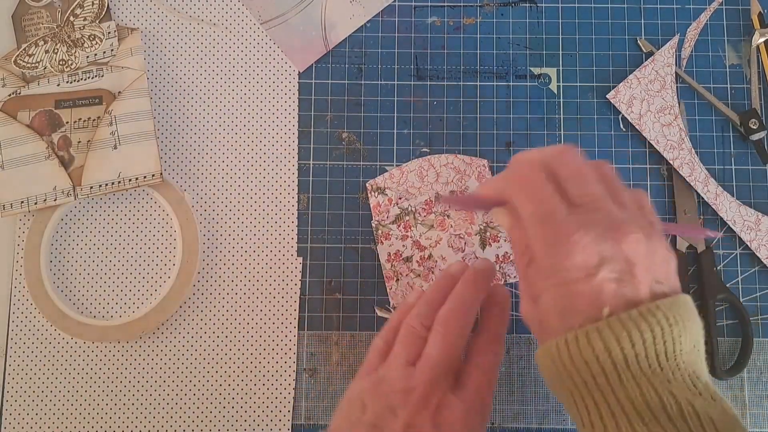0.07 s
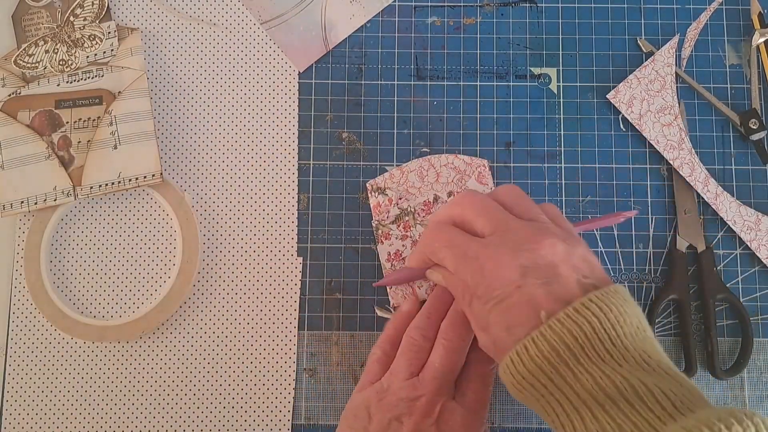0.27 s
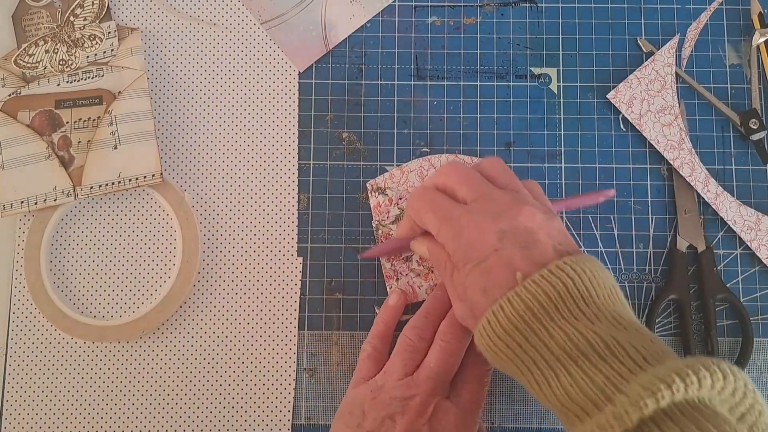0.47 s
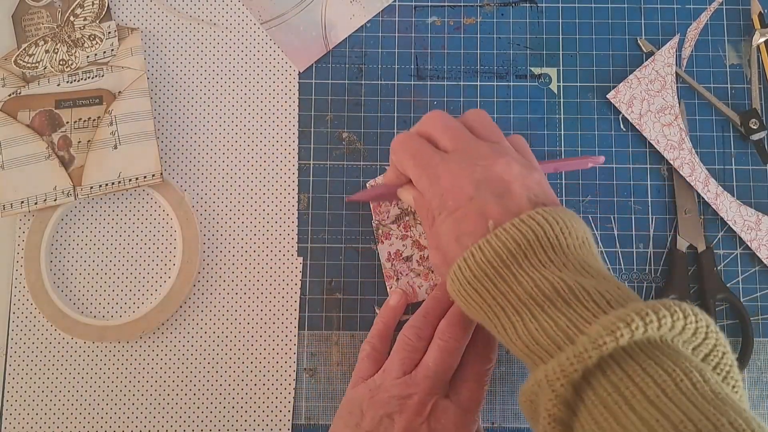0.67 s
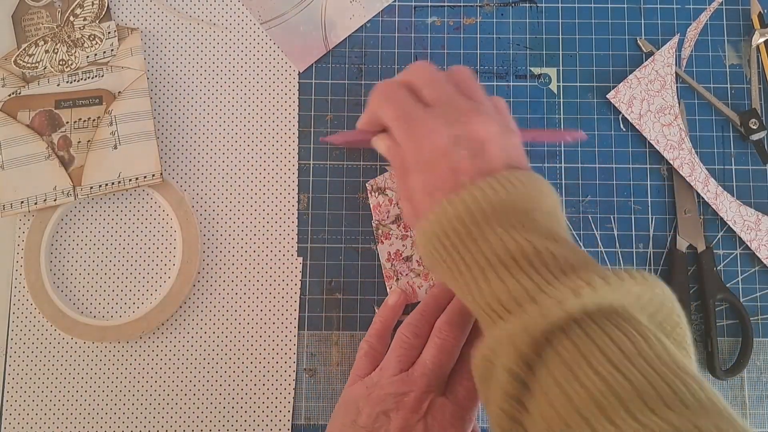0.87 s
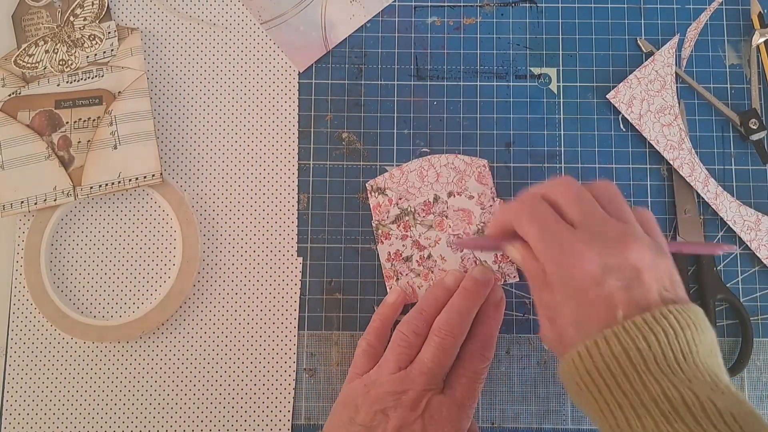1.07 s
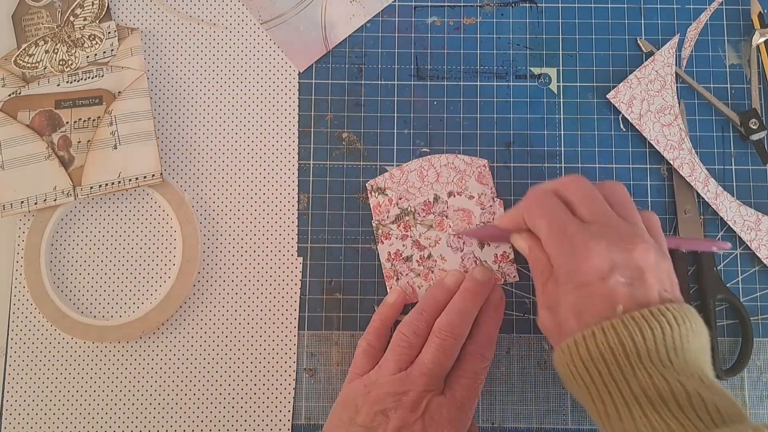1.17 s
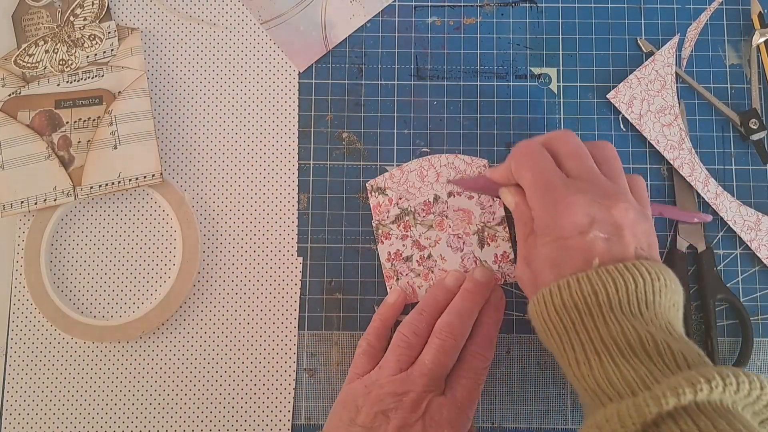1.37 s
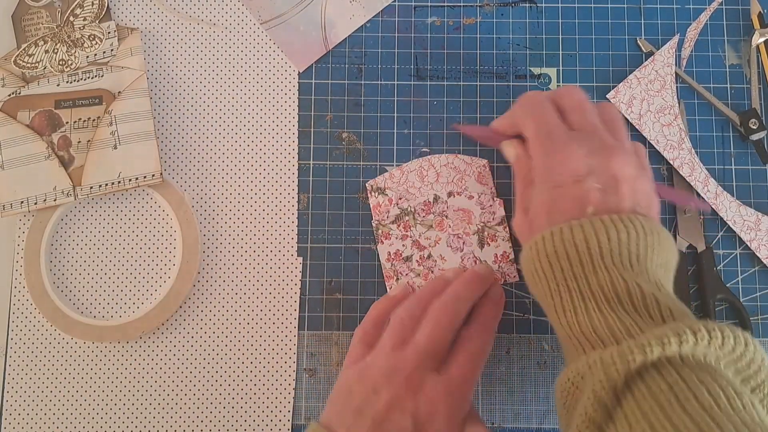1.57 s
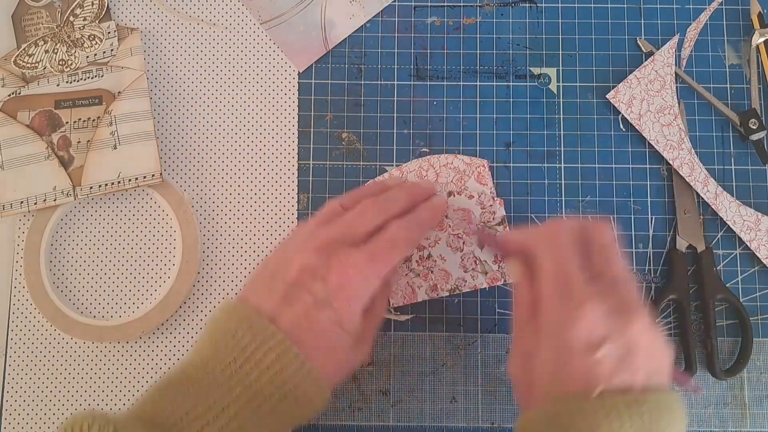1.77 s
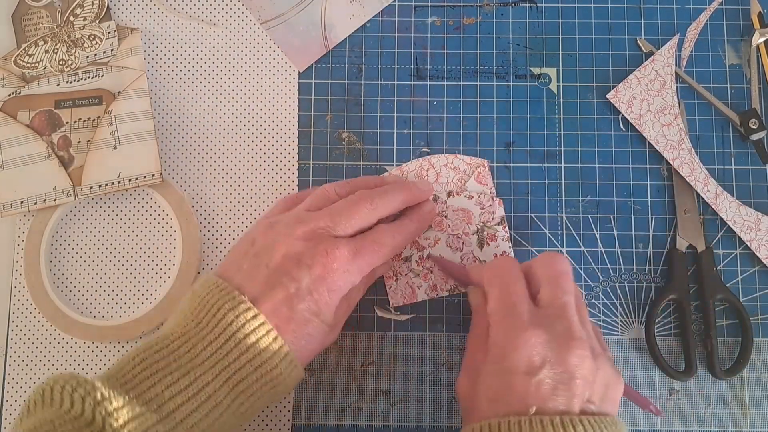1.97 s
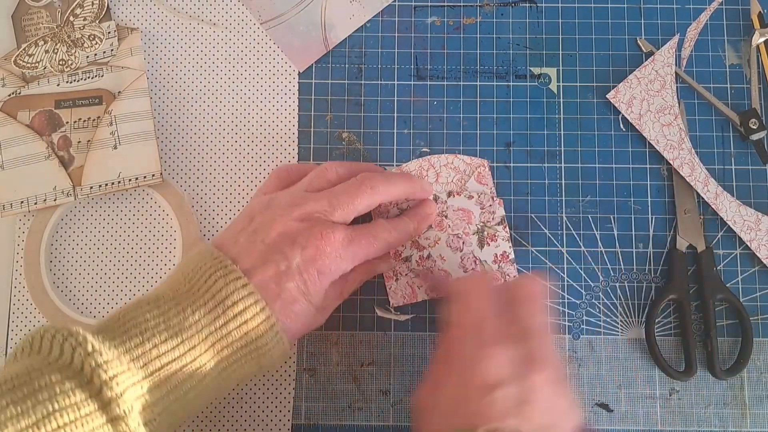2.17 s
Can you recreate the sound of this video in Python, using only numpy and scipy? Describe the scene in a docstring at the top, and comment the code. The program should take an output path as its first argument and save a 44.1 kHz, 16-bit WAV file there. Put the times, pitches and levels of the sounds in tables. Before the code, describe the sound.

A folding tool rubs and taps along paper on a cutting mat, with soft thumps.

```python
"""A small room, close to a cutting mat where a bone folder creases folded paper.
Its tip rubs along the fold, tiny slips over the fibres making the paper hiss, and taps down on the mat.
The paper ticks and swishes as the fingers shift it; the pressing hands thump the table beneath.
Beside the hiss is a faint, breath-like airy noise with steady resonances near 400 and 1900 Hz.
One soft, very low bump comes early, like a puff of air on the microphone; a quiet rumble lies under all."""
import sys
import numpy as np
from scipy import signal
from scipy.fft import rfft, irfft, next_fast_len
from scipy.io import wavfile
from scipy.ndimage import map_coordinates

SR = 44100
rng = np.random.default_rng(int(sys.argv[2]) if len(sys.argv) > 2 else 0)


def wrap_up_sound(samples):
    """Save the sound to the file named by the first command line argument, as 16-bit audio."""
    columns = np.atleast_2d(samples).T
    # keep every value between -1 and 1, then stretch to whole-number steps
    tamed = np.clip(columns, -1, 1)
    steps = np.round(tamed * 32767).astype(np.int16)
    wavfile.write(sys.argv[1], SR, steps)


N = 97284


# envelope of the paper's hiss: time_s, relative_db
HISS_ENVELOPE = [(0.0, -65), (0.31, -92.5), (0.5, -71), (0.71, -60.5), (0.78, -68), (0.92, -69.5),
                 (1.05, -87), (1.27, -71.5), (1.39, -73.5), (1.51, -73.5), (1.95, -79.5), (2.08, -76),
                 (2.2, -81)]
# tone of the hiss: frequency_hz, gain_db
HISS_EQ = [(200, -50), (900, -7), (2500, -4), (4000, -0.5), (5500, 0.5), (7700, 2), (9200, -2),
           (11800, -0.5), (15500, -8.5)]

def folder_rub(gain_db=1.5):
    """Tiny slips under the tip make the paper hiss."""
    return amp(gain_db) * ride(HISS_ENVELOPE) * spread(grains(), lambda hz: amp(curve(HISS_EQ, hz)))


# hits of the tip: start_s, level_db, ring_hz, ring_db, treble_db, t60_s, pan_db
TIP_HITS = [(.2785, -51, 2830, 14, -6, 0.039, 0.5), (.3835, -57, 3500, 7, 0, 0.023, -4),
            (.727, -50, 2200, 4, -8, 0.012, 5), (.876, -37.5, 2880, 9, -18, .035, -0.5),
            (.919, -50, 2800, 10, -20, 0.028, -10), (1.214, -29, 1326, 10.5, -5, 0.0088, -4),
            (1.6285, -42, 1830, 7, -12.5, 0.083, -4), (1.9928, -31.5, 3340, 5.5, -1.5, 0.016, -5)]
# tone of a hit: frequency_hz, gain_db
TIP_EQ = [(100, -9.5), (400, -9), (700, -7), (1100, -0.5), (1700, -8), (2450, -0.5), (3300, -4),
          (3950, 2.5), (5000, -4.5), (6700, -6), (9200, -10.5), (12000, -15.5), (15500, -21)]

def folder_taps():
    """The folder's tip meets the mat with a short knock."""
    return clicks(TIP_HITS, TIP_EQ, ring_octaves=0.16)


# paper snaps: start_s, level_db, ring_hz, ring_db, treble_db, t60_s, pan_db
SNAPS = [(.0925, -38, 3200, 10.5, 1, 0.015, 1), (.1635, -63, 4000, -7, 5, .006, 2),
         (.198, -54, 2780, 8, 1, 0.0053, 4), (.219, -57, 9835, 6, 5, .006, 2),
         (.296, -44, 3800, 7.5, 3.5, 0.023, 1), (.4735, -61, 7500, 12, 6, .006, -8),
         (.783, -45, 6000, -5, 8, 0.0042, 0), (1.635, -42.5, 13100, 7, -6, .01, 8),
         (1.6895, -42.5, 10600, 12, -3.5, .005, 2), (1.7033, -43, 7000, 3, 0, 0.0054, -4),
         (1.7063, -35.5, 6740, 2, 11, 0.0081, 1.5), (1.737, -47, 3360, 14, 9, .012, -3),
         (1.864, -50, 2520, 5, -4, 0.032, -0.5), (1.8935, -44, 3950, 10.5, -4.5, .008, -4.5),
         (1.973, -58, 3180, 10, 0, .05, 0)]
# tone of a snap: frequency_hz, gain_db
SNAP_EQ = [(200, -43), (1200, 0), (2500, -3), (4000, -1), (7500, 0), (9200, -8), (12000, -4), (15500, -8.5)]

def paper_ticks():
    """Paper edges snap with a thin, bright click."""
    return clicks(SNAPS, SNAP_EQ, ring_octaves=0.23)


# finger slides: peak_s, level_db, rise_s, fall_s, treble_db
SLIDES = [(0.01, -55.5, 0.047, 0.058, -11), (.305, -69.5, 0.016, 0.025, 0.5), (.4, -72, .015, 0.014, 3),
          (0.909, -59, 0.034, 0.027, -20), (1.487, -63.5, 0.011, 0.012, 5.5), (1.725, -60, 0.035, 0.013, 4),
          (1.892, -62.5, 0.014, 0.016, 3.5), (2.155, -59.5, .027, 0.022, 1.5)]
# tone of a slide: frequency_hz, gain_db
SLIDE_EQ = [(200, -7.5), (700, -3), (1500, -9.5), (2100, -2), (2700, 1.5), (3700, 0), (5200, -1.5),
            (7700, -4.5), (9200, -9), (12000, -4.5), (15500, -13.5)]

def paper_swishes(flutter_db=0.0):
    """Fingers and paper slide: brief friction that swells and fades."""
    out = np.zeros((2, N))
    for peak_s, db, rise_s, fall_s, treble_db in SLIDES:
        t = clock() - peak_s
        swell = np.exp(-.5 * (t / np.where(t < 0, rise_s, fall_s)) ** 2)
        friction = spread(grains(), lambda hz: amp(curve(SLIDE_EQ, hz) + treble_db * shelf(hz)))
        out += amp(db) * swell * friction
    return out * amp(flutter_db * wobble(knots_per_s=140))


# one soft, puff-like bump, then the hands' thumps: start_s, level_db, cutoff_hz
BUMPS = [(0.375, -44.5, 50), (0.679, -52.5, 110), (.729, -36, 74), (.836, -40.5, 120), (0.873, -36, 117),
         (0.919, -36.5, 191), (1.0, -54, 123), (1.215, -43.5, 214), (1.461, -40, 162), (1.627, -36.5, 193),
         (1.89, -58, 90), (1.995, -37.5, 152), (2.115, -59, 500)]
# the table's low modes: pitch_hz, gain_db, t60_s
TABLE_MODES = [(47.9, -1, 0.29), (71, -4.5, 0.14), (109.7, 0, 0.27), (152, 3, 0.21), (240.5, -4, 0.19),
               (336.5, -7, 0.093), (396, -7, 0.14)]

def low_thumps(attack_s=0.011, thud_db=-6.5, thud_t60_s=.16):
    """Low modes ring over a noisy thud; a softer bump reaches fewer of them."""
    out = np.zeros((2, N))
    for start_s, db, cutoff_hz in BUMPS:
        t = np.maximum(clock() - start_s, 0)
        lowpass = lambda hz: 1 / np.sqrt(1 + (hz / cutoff_hz) ** 4)
        ring = sum((-1) ** k * amp(gain_db) * lowpass(hz) * fade(t, t60) * np.sin(2 * np.pi * hz * t)
                   for k, (hz, gain_db, t60) in enumerate(TABLE_MODES))
        thud = spread(rng.standard_normal((2, N)), lambda hz: lowpass(hz) * hz ** 2 / (hz ** 2 + 45 ** 2))
        attack = 1 - np.exp(-t / attack_s)
        out += amp(db) * attack * (ring + amp(thud_db) * thud * fade(t, thud_t60_s))
    return out


# envelope of the airy noise: time_s, relative_db
AIR_ENVELOPE = [(0.0, -54.5), (0.1, -70.5), (0.27, -79), (0.34, -91.5), (0.51, -83), (0.58, -69),
                (0.7, -72.5), (0.77, -68.5), (0.94, -67), (1.38, -83), (1.58, -83), (1.71, -88),
                (1.93, -107), (2.07, -80), (2.2, -87)]
# its resonances: pitch_hz, width_hz, gain_db
AIR_RESONANCES = [(362.3, 72, 9), (438.5, 77, 9), (770, 380, -6.5), (1162, 210, -5.5), (1557, 180, -2.5),
                  (1910, 130, 4), (2340, 250, -4.5), (3070, 770, -8.5)]

def breathy_air(gain_db=7):
    """A faint, breath-like noise with steady resonances near 400 and 1900 Hz."""
    def tone(hz):
        return sum((-1) ** k * amp(db) * 1j * hz * width / (pitch ** 2 - hz ** 2 + 1j * hz * width)
                   for k, (pitch, width, db) in enumerate(AIR_RESONANCES))
    return amp(gain_db) * ride(AIR_ENVELOPE) * spread(grains(), tone)


# reverb decay: frequency_hz, t60_s
ROOM_DECAY = [(100, 0.39), (1000, 0.26), (4000, 0.18), (15000, 0.15)]

def room_reverb(x, tail_db=-5, early_db=-2.5, early_t60_s=0.036):
    """Near surfaces answer at once, the room with a short tail."""
    hz, t, spectrum = signal.stft(rng.standard_normal((2, SR // 2)), SR, nperseg=256)
    tail = signal.istft(spectrum * fade(t, curve(ROOM_DECAY, hz)[:, None]), SR, nperseg=256)[1]
    t = np.arange(tail.shape[1]) / SR
    tail *= t > .004  # pre-delay
    early = rng.standard_normal(tail.shape) * (rng.random(tail.shape) < .05) * fade(t - .001, early_t60_s)
    impulse = amp(tail_db) * tail / np.linalg.norm(tail[0])
    impulse += amp(early_db) * early / np.linalg.norm(early[0])
    return signal.fftconvolve(x, impulse, axes=1)[:, :N]


# tone of the noise bed: frequency_hz, gain_db
FLOOR_EQ = [(20, 4.5), (50, 26.5), (80, 17.5), (130, 14), (200, 5), (400, 1.5), (800, -12), (2000, -22.5),
            (6000, -25.5), (15500, -10)]

def noise_floor(level_db=-69.5):
    """A steady low rumble with a trace of hiss."""
    return amp(level_db) * spread(rng.standard_normal((2, N)), lambda hz: amp(curve(FLOOR_EQ, hz)))


def grains(per_s=5000, size_spread_db=2):
    """Dense tiny impulses of uneven size."""
    size = amp(size_spread_db * np.minimum(rng.exponential(size=N), 5))
    return rng.standard_normal((2, N)) * size * (rng.random(N) < per_s / SR)


def clicks(hits, eq, ring_octaves, crack_share=0.47, crack_t60_s=0.0018, size=4096):
    """Each hit is a sharp crack and a short scatter of noise through one broad resonance."""
    out = np.zeros((2, N + size))
    t, hz = np.arange(size) / SR, np.fft.rfftfreq(size, 1 / SR)
    for start_s, db, ring_hz, ring_db, treble_db, t60, pan_db in hits:
        ring = np.exp(-.5 * (np.log2((hz + 1) / ring_hz) / ring_octaves) ** 2)
        tone = unit_rms(amp(curve(eq, hz) + ring_db * ring + treble_db * shelf(hz)))
        envelope = (1 - crack_share) * fade(t, t60) + 2 * crack_share * fade(t, crack_t60_s)
        burst = rng.standard_normal((2, size)) * envelope
        mid, side = irfft(rfft(burst) * minimum_phase(tone) * mid_side(hz))
        gains = amp(db + np.array([[pan_db], [-pan_db]]) / 2)
        start = round(start_s * SR)
        out[:, start:start + size] += gains * [mid + side, mid - side]
    return out[:, :N]


# stereo image: frequency_hz, left_right_correlation
STEREO_IMAGE = [(50, 0.85), (200, 0.92), (450, 0.58), (1100, 0.075), (2200, 0.33), (4000, 0.26),
                (12000, 0.061)]

def mid_side(hz):
    """Mid and side gains that set the stereo width."""
    angle = np.arccos(curve(STEREO_IMAGE, hz)) / 2
    return np.array([np.cos(angle), np.sin(angle)])


def spread(pair, tone):
    """Two unrelated signals become coloured stereo of rms 1."""
    mid, side = filtered(pair, lambda hz: tone(hz) * mid_side(hz))
    return unit_rms(np.array([mid + side, mid - side]))


def amp(db):
    """Decibels to gain."""
    return 10 ** (np.asarray(db) / 20)


def unit_rms(x):
    """Scale to rms 1."""
    return x / np.sqrt(np.mean(x ** 2) + 1e-20)


def curve(points, hz):
    """Read (frequency_hz, value) points on a log axis."""
    knots_hz, values = np.transpose(points)
    return np.interp(np.log(hz + 1), np.log(knots_hz + 1), values)


def ride(points):
    """A fader ride through (time_s, gain_db) points."""
    return amp(np.interp(clock(), *np.transpose(points)))


def shelf(hz):
    """Treble shelf: 0 in the mids, 1 at the top."""
    return curve([(2440, 0), (8800, 1)], hz)


def clock():
    """Time of every sample."""
    return np.arange(N) / SR


def fade(t, t60):
    """Exponential decay that starts at t = 0."""
    return (t >= 0) * np.exp(-np.log(1000) * np.maximum(t, 0) / t60)


def wobble(knots_per_s):
    """A smooth random curve."""
    return map_coordinates(rng.standard_normal(N // 50), [clock() * knots_per_s], mode="wrap")


def filtered(x, response):
    """Pass x through a complex frequency response."""
    size = next_fast_len(N + SR // 4)
    return irfft(rfft(x, size) * response(np.fft.rfftfreq(size, 1 / SR)), size)[..., :N]


def minimum_phase(gain):
    """A response with this gain and no pre-ring."""
    cepstrum = irfft(np.log(np.maximum(gain, 1e-6)))
    half = len(cepstrum) // 2
    cepstrum[1:half] *= 2
    cepstrum[half + 1:] = 0
    return np.exp(rfft(cepstrum))


def scene(flutter_db=0.86):
    """Folder, paper and airy noise in the room, over the thumps and the quiet floor."""
    hisses = (breathy_air() + folder_rub()) * amp(flutter_db * wobble(knots_per_s=70.14))
    close = hisses + paper_swishes() + folder_taps() + paper_ticks()
    bed = noise_floor()
    return close + room_reverb(close) + low_thumps() + bed


# microphone balance: frequency_hz, left_over_right_db
MIC_BALANCE = [(40, -3.5), (140, 0.5), (280, 8), (550, 2), (1100, 1), (2200, 0.5), (4000, -0.5),
               (8000, -1.5), (12500, 3)]

def record(dry, top_hz=15800):
    """The two microphones differ a little in colour and keep nothing above the band limit."""
    balance = lambda hz: amp(curve(MIC_BALANCE, hz) * np.array([[.5], [-.5]]))
    return filtered(dry, lambda hz: balance(hz) / np.sqrt(1 + (hz / top_hz) ** 160))


dry = scene()
out = record(dry)
wrap_up_sound(out)
```